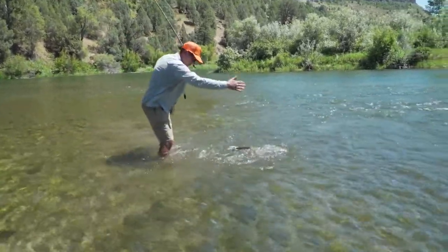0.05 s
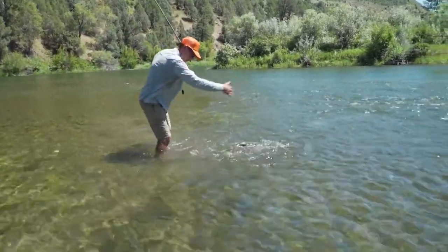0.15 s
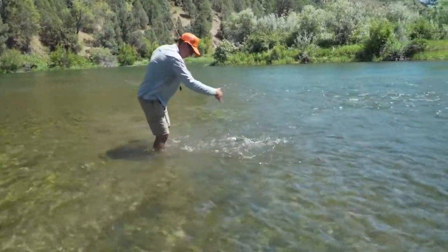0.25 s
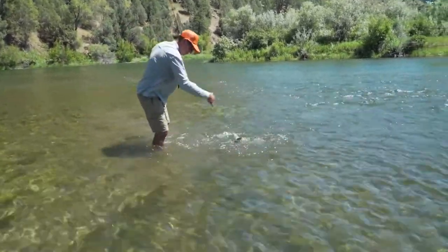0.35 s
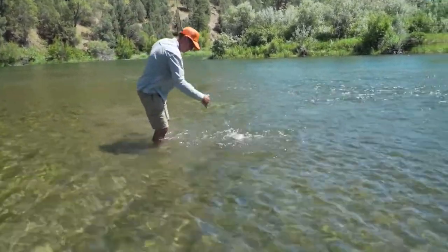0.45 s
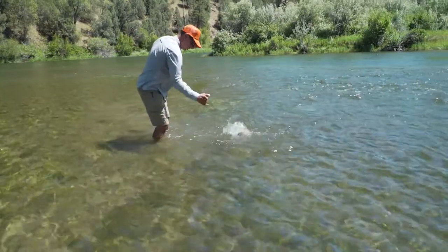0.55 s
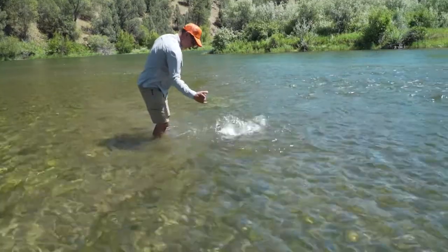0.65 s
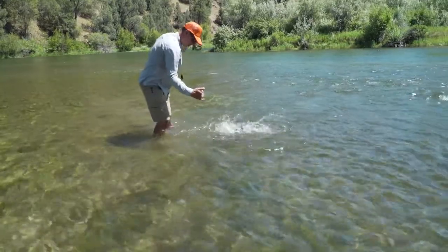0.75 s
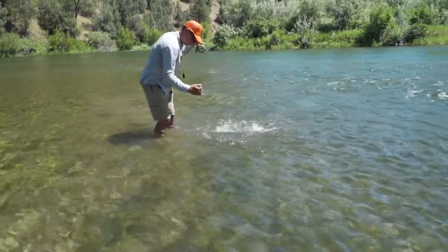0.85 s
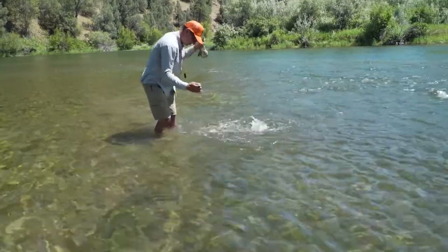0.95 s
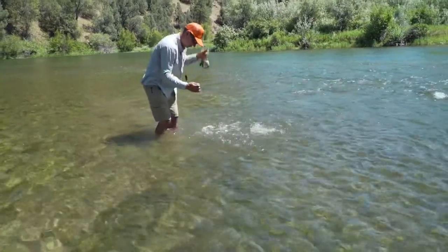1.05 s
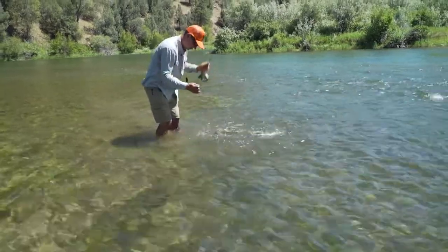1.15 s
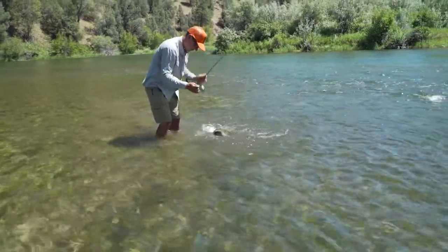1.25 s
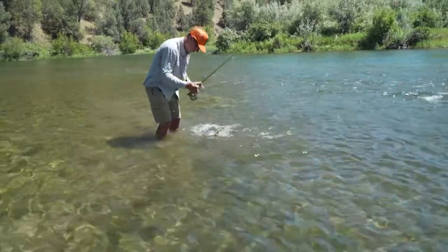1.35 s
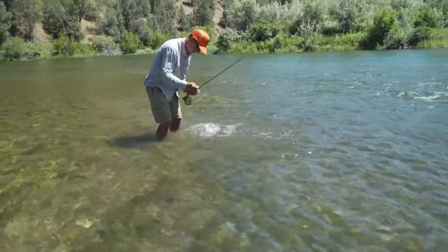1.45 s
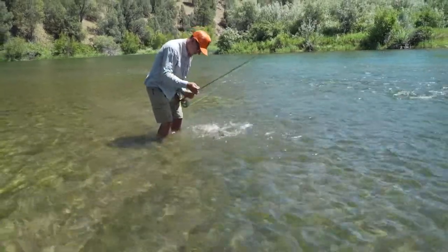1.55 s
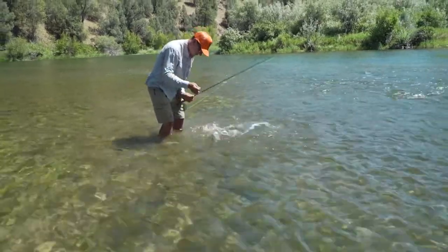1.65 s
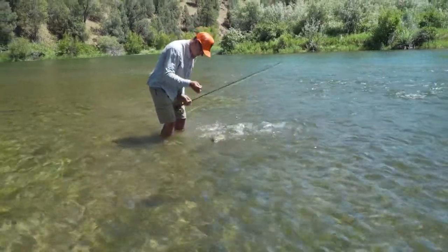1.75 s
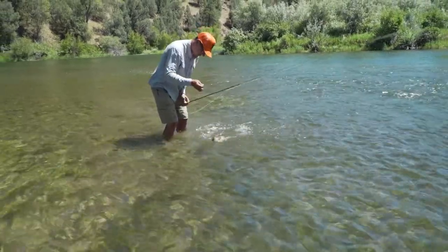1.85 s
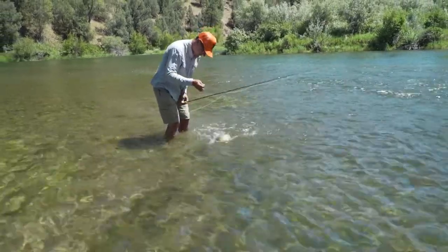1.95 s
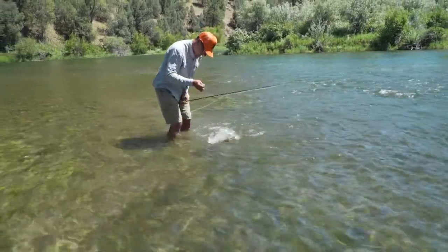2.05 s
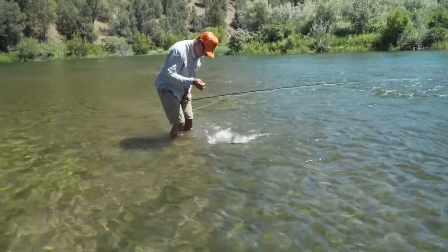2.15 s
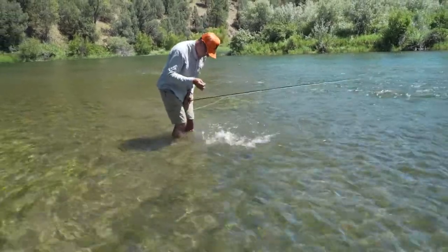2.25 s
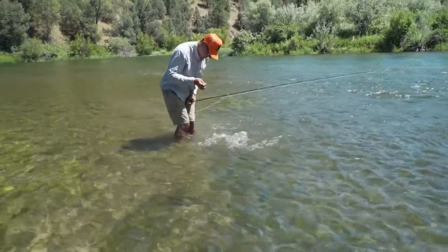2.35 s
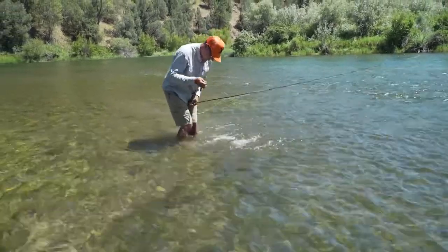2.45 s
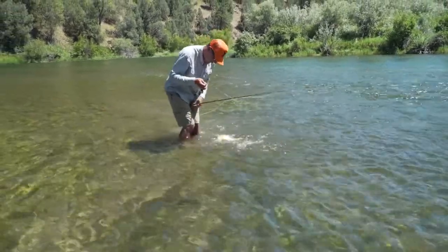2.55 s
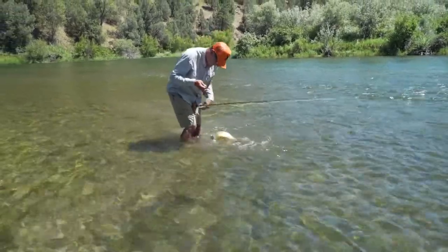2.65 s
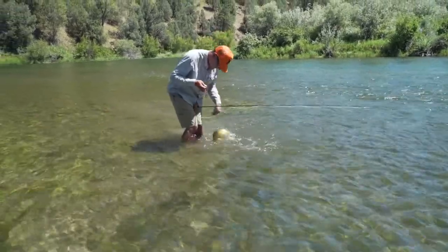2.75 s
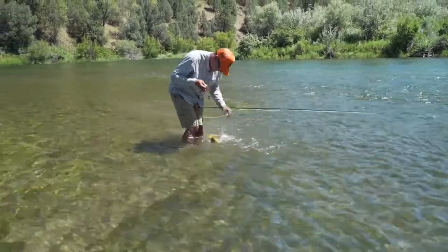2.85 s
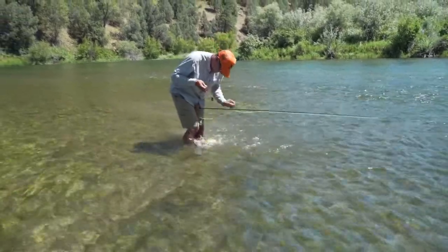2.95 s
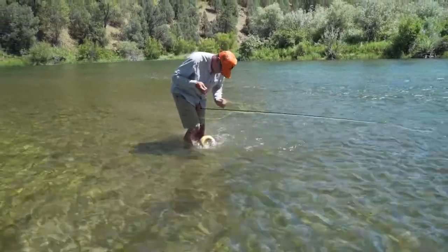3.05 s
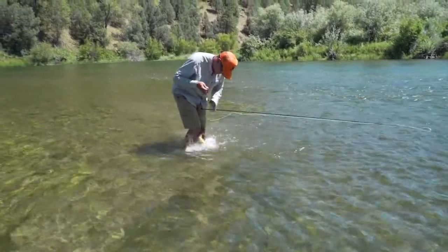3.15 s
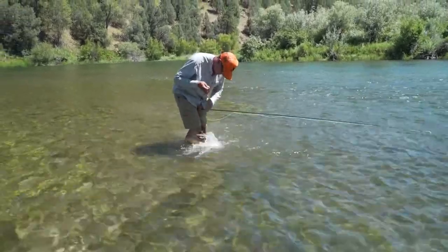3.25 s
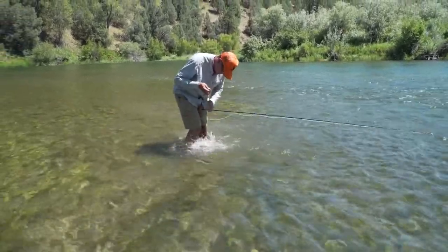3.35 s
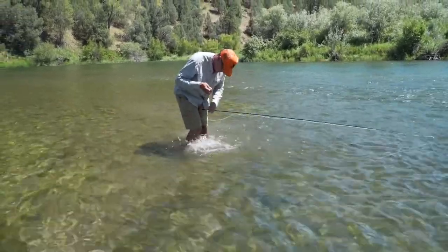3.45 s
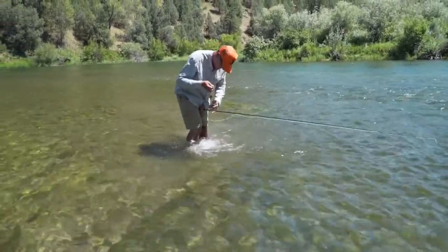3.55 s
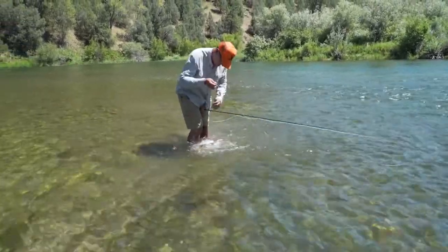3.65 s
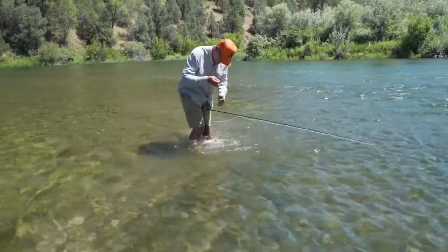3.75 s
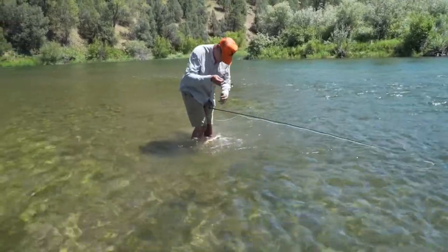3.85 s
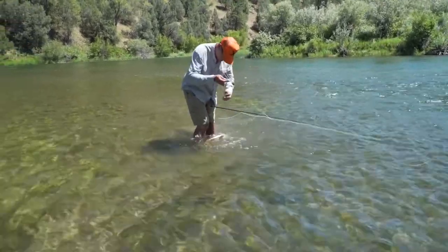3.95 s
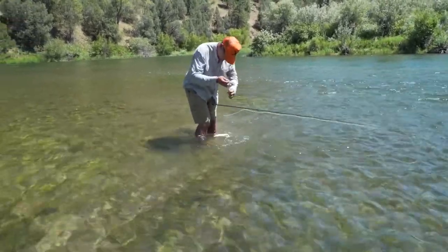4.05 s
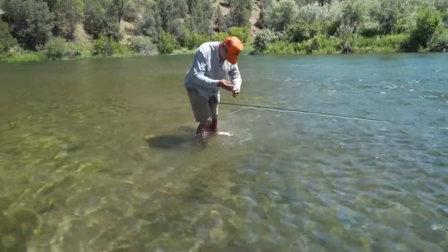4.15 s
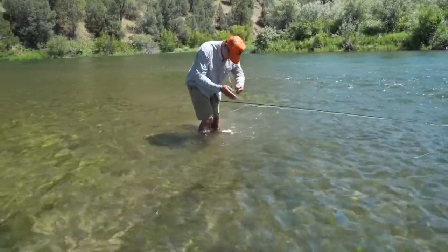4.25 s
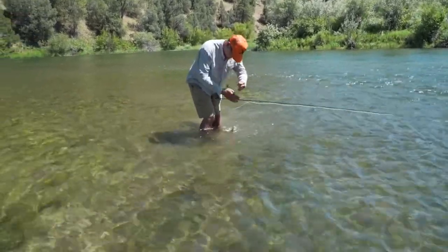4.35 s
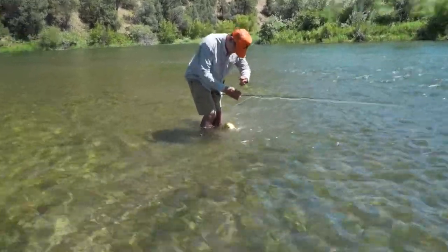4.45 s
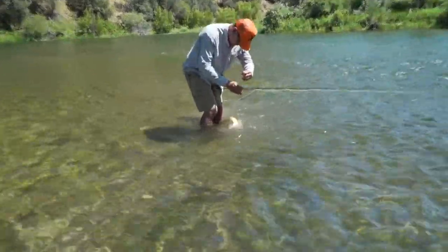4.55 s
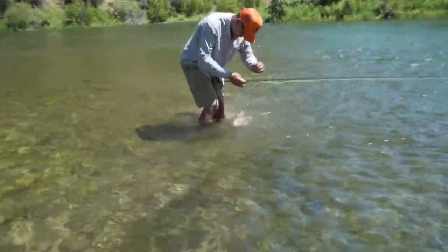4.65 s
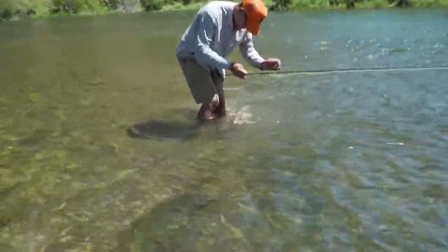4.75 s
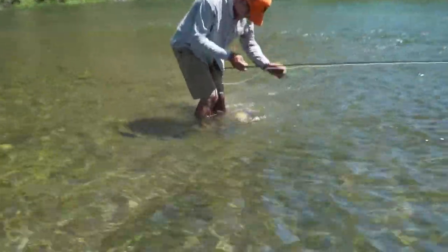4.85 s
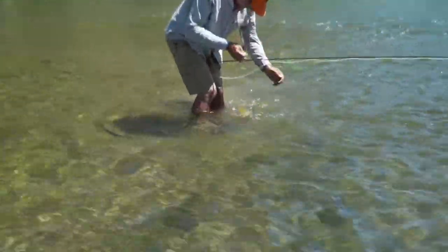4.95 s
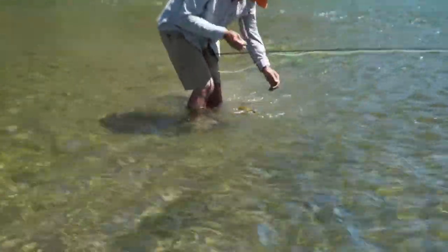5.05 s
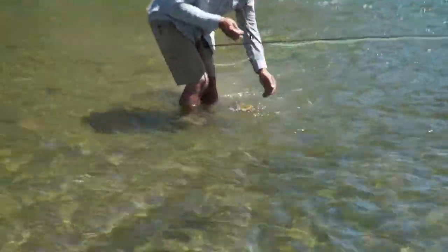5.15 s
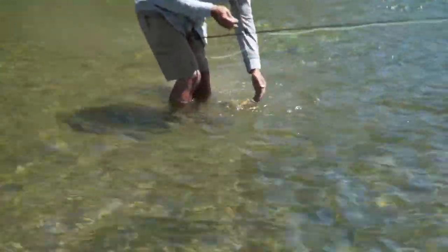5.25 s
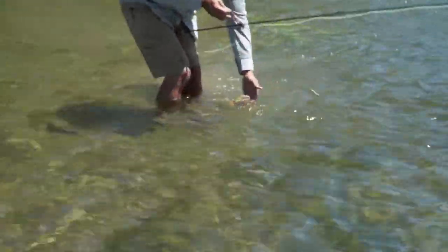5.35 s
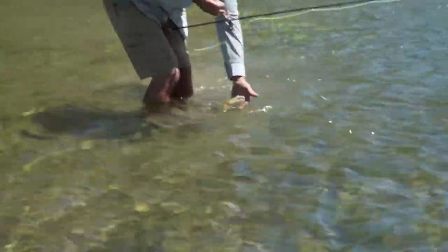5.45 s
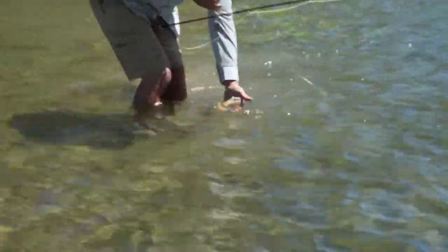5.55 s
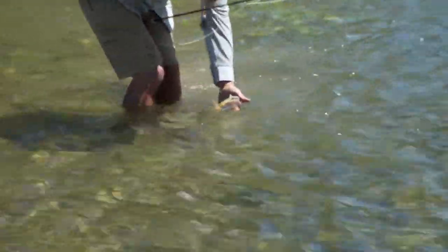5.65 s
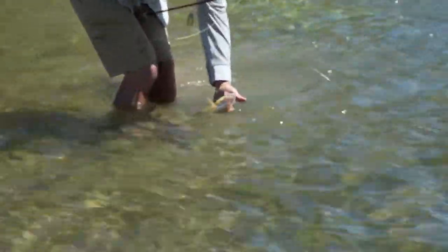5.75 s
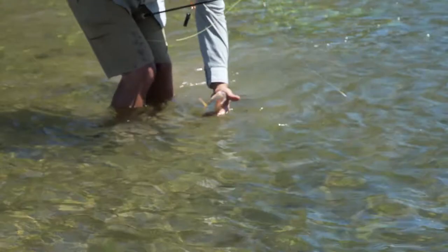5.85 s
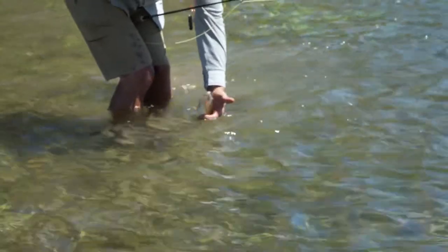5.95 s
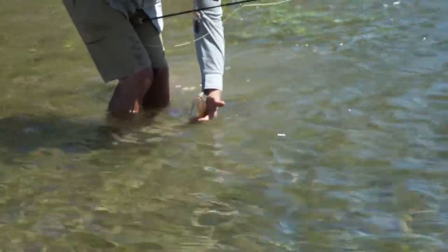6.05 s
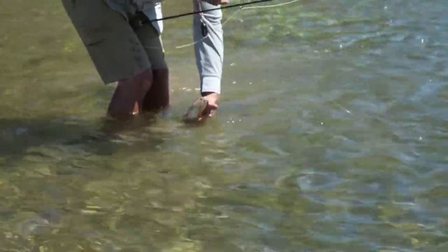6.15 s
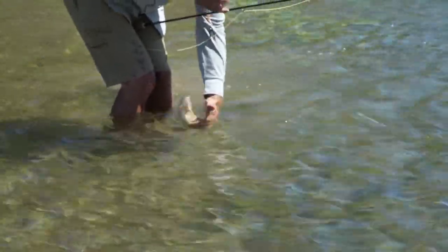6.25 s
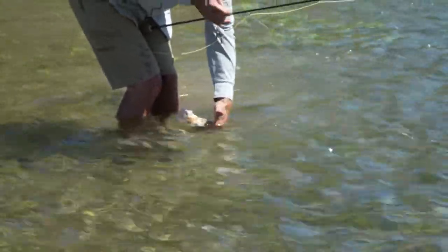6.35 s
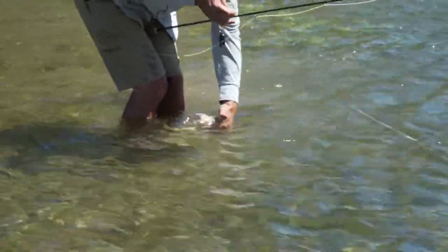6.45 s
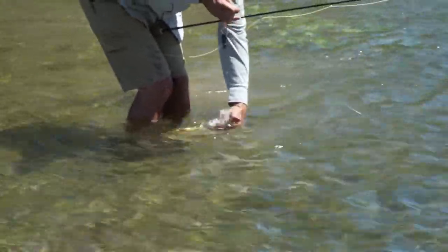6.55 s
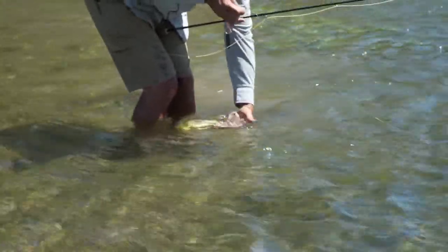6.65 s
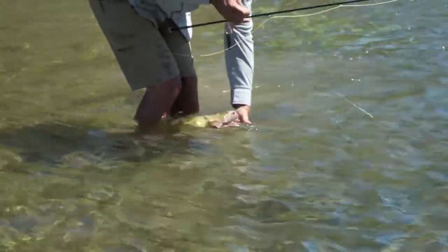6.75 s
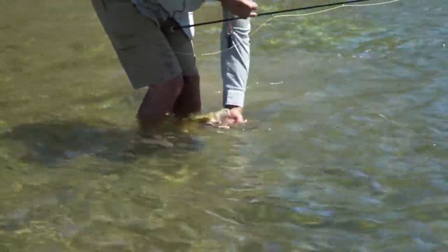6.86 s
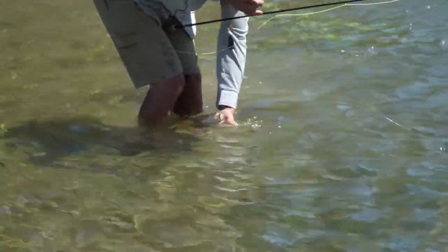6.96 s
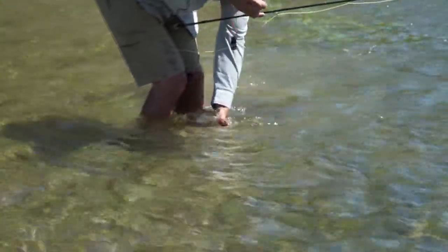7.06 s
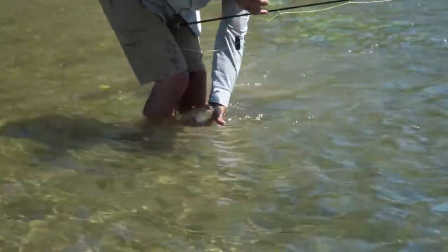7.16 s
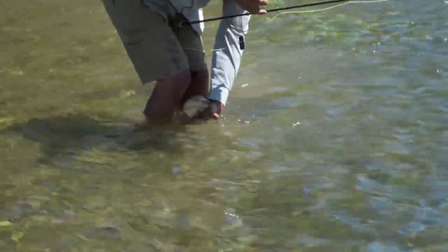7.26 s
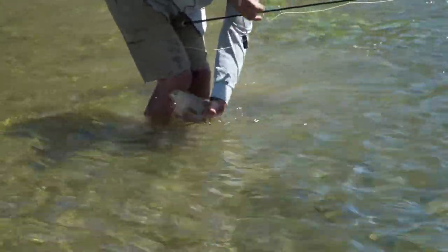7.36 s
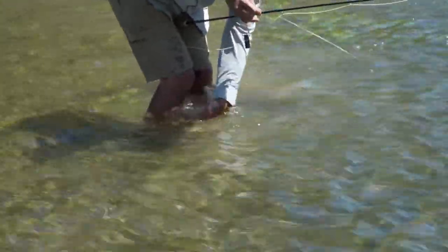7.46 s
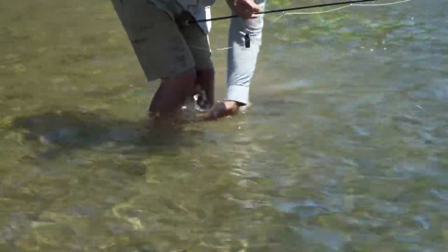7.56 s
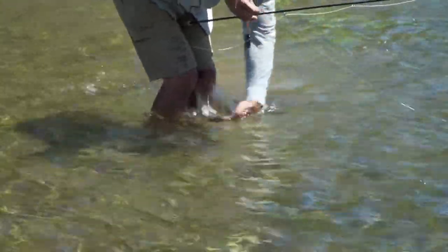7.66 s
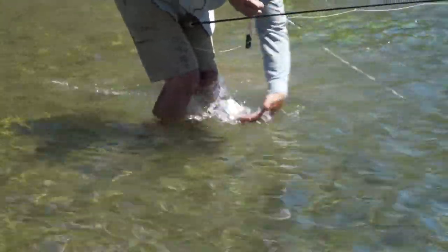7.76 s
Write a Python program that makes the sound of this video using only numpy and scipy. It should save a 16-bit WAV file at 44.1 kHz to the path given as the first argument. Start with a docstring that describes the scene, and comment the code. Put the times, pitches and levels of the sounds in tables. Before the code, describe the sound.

A soft, even river hiss with tiny ripples continues throughout, close and dry in open air. From 0 s a fish beats the surface: light spray and small bubbles first, then denser churning at 0.45-0.9 s with gulps and flicks. After a lull, a loud hollow plop and dull slap land at about 1.36 s, followed by quick splashes and a thin spurt. More gurgling strokes come around 1.9-2.4 s, weaker ones next, then a heavy, bright splash at 3.0-3.2 s, thinning by 3.7 s. Foam fizzes and drops fade. At 4.2 s stirring resumes; a sharp, deep pop hits at 4.55 s, with bubbles and drips after and wet flicks at 5.3 s. Calm follows until 6.6 s, when small slaps and plinks begin. From 7.5 s splashing grows, surging at 7.7 s into strong churning and hollow plops, still active at the end.

```python
"""A hooked fish thrashes at the surface of a shallow river while an angler draws it in by hand.
The current hisses softly throughout. From the start, strokes churn bubbles and foam and throw spray that
patters back; drips ring, closed air pockets ring with a pitch glide (mostly up), sheets of water smack and,
from 1.4 s, thin jets hiss. Bouts fill 0-3.7 s, 4.2-5.3 s and 6.6 s to the end; foam and falling drops
fade in between. Bubbles are gliding decaying sines, washes are coloured noise."""
import sys
import numpy as np
from scipy import signal
from scipy.fft import rfft, irfft
from scipy.io import wavfile
from scipy.ndimage import map_coordinates

SR = 44100
rng = np.random.default_rng(int(sys.argv[2]) if len(sys.argv) > 2 else 0)


def put_to_file(sound):
    """Save the sound as 16-bit audio at rate SR, in the file named by the first command-line argument."""
    columns = np.atleast_2d(sound).T  # one column per channel
    safe = np.clip(columns, -1, 1)
    whole_steps = np.round(safe * 32767)
    wavfile.write(sys.argv[1], SR, whole_steps.astype(np.int16))


N = 344862

# Spectra of the continuous hiss: (frequency [Hz], relative density [dB per Hz])
RIVER_SPECTRUM = [(13, -66), (22, -1), (44, -15), (92, -3.5), (132, -2), (263, -6), (302, -7.5), (398, -11),
                  (510, -10), (961, -14.5), (1580, -17.5), (1910, -19.5), (2520, -20), (10600, -20.5),
                  (16000, -20.5)]
CHURN_SPECTRUM = [(50, -14), (90, 5.5), (140, 6), (230, -2), (350, 0.5), (480, 3.5), (620, 3.5), (830, 1),
                  (1080, -4.5), (1400, 0.5), (1750, -20), (2400, -18), (4000, -18)]
HEAVE_SPECTRUM = [(22, -32), (50, -4.5), (100, -3), (170, -11), (300, -13), (600, -69)]
BIG_DROP_SPECTRUM = [(1100, -1.5), (1900, -1), (2600, -3), (3400, -3.5), (4300, -2), (5100, -18),
                     (7000, -19)]
FINE_DROP_SPECTRUM = [(3200, -32), (4900, -5), (6400, -2.5), (8500, -5.5), (11000, -4), (13500, -1),
                      (16000, -8.5)]
SMACK_SPECTRUM = [(150, 31), (700, -2), (1500, 6.5), (3000, 3.5), (5000, 0), (8000, -0.5), (13000, -2),
                  (16000, 4.5)]
# Strokes of body and tail: (time [s], swell [s], hold with swell [s], churn level [dB], spray level [dB],
# big over fine drops [dB]); levels nominal
STROKES = [ (0, 0.0027, 0.021, -57, -61, -1.5), (0.077, 0.015, 0.2, -63, -62.5, -2),
           (0.329, 0.015, 0.032, -59.5, -65, 0), (0.428, 0.01, 0.013, -53.5, -55, 1.5),
           (0.48, .01, 0.055, -47.5, -56.5, 4.5), (0.572, .015, 0.041, -46, -60.5, 4.5),
           (0.631, 0.02, 0.025, -44, -50.5, 1.5), (0.704, 0.023, 0.04, -51, -53.5, .5),
           (0.778, .04, 0.078, -48.5, -53.5, 3), (0.87, .015, 0.077, -64, -61.5, 5),
           (0.966, 0.022, 0.14, -58.5, -66, -2), (1.306, 0.061, 0.047, -50.5, -53.5, 7),
           (1.398, 0.018, 0.036, -45, -53.5, 5.5), (1.509, .015, 0.034, -49.5, -58, 1),
           (1.571, 0.017, 0.04, -49, -58, 0.5), (1.63, 0.011, 0.025, -48.5, -58.5, -16),
           (1.932, 0.059, 0.076, -45.5, -62, 7), (2.051, .004, 0.095, -46.5, -59, -0.5),
           (2.162, 0.037, .13, -48, -61.5, 4.5), (2.315, 0.0087, 0.02, -52, -56.5, 3),
           (2.37, .015, 0.026, -55, -63.5, 4), (2.44, 0.012, 0.089, -60, -64.5, 3.5),
           (2.606, .015, .04, -55.5, -62.5, -1), (2.816, .015, 0.11, -58, -63, -1.5),
           (2.961, 0.023, .045, -45.5, -56, -4), (3.067, 0.038, 0.027, -38, -46, -5.5),
           (3.135, 0.011, 0.07, -49, -56, -0.5), (3.215, 0.015, 0.072, -55, -61, -8),
           (3.295, 0.029, 0.092, -46, -53.5, -4), (3.447, 0.025, 0.11, -51.5, -57, -3),
           (3.564, .02, 0.11, -56.5, -65.5, 2), (3.682, 0.013, .05, -56, -63, -9),
           (4.184, 0.14, 0.23, -67, -79.5, 8), (4.424, 0.06, 0.13, -53.5, -61.5, -1.5),
           (4.658, 0.06, 0.042, -56.5, -56.5, -6), (4.734, 0.019, 0.014, -50.5, -63, 1),
           (5.288, .015, 0.025, -58.5, -62.5, 5), (6.626, 0.031, 0.038, -67, -66.5, 1),
           (6.79, .02, 0.21, -74, -71.5, -2), (7.034, 0.026, 0.079, -61, -66, 0.5),
           (7.33, 0.053, 0.088, -66.5, -65.5, 0.5), (7.438, 0.024, 0.089, -59, -63, 1),
           (7.528, .02, 0.034, -48, -51.5, -3), (7.617, 0.02, 0.02, -53.5, -60.5, 2.5),
           (7.645, .015, 0.05, -52, -62.5, 4), (7.675, 0.042, .055, -38.5, -49.5, 0),
           (7.767, 0.017, .07, -42.5, -62, 5)]
# Biggest drops falling back: (time [s], peak level [dB], pitch [Hz])
DRIPS = [ (.091, -55, 2200), (.144, -49.5, 2780), (0.266, -40.5, 6600), (0.489, -38, 2100),
         (.935, -43.5, 1130), (1.008, -49, 1820), (1.273, -46.5, 2600), (1.328, -41.5, 4100),
         (1.578, -40.5, 2870), (1.629, -42, 3930), (2.398, -41.5, 1370), (2.526, -47.5, 3760),
         (2.76, -47, 1190), (3.239, -44, 1350), (3.607, -45.5, 2690), (4.737, -44, 1100),
         (4.763, -40, 5650), (4.865, -52, 1380), (4.986, -52, 2050), (5.083, -56.5, 1550),
         (5.14, -48, 4920), (5.268, -50.5, 1570), (6.471, -55.5, 1480), (6.791, -44, 2230),
         (6.814, -45, 1590), (6.955, -54.5, 4100), (7.087, -46.5, 1420), (7.101, -47, 4920),
         (7.256, -55, 1470), (7.359, -51.5, 1520), (7.463, -48, 1680), (7.516, -44.5, 1390),
         (7.648, -47, 2170), (7.782, -40, 1400)]
# Air pockets closed by the fish: (time [s], nominal peak level [dB], starting pitch [Hz],
# rise [octaves/s], swell [s], t60 [s])
POCKETS = [ (.109, -50, 520, 2, .003, .11), (.178, -39.5, 874, -10, .0006, .034),
           (.331, -47, 595, -2.5, .001, .1), (.523, -36, 617, -6, .0066, .035),
           (.547, -31, 730, -5, .0017, .01), (.55, -41.5, 132, 22, .004, .18),
           (.5818, -29.5, 452, 43, .002, .12), (.649, -36, 654, 45, .005, .04),
           (.818, -39, 980, 33, .003, .02), (1.024, -40.5, 660, -4, .0023, .018),
           (1.04, -53, 401, 13, .018, .11), (1.3632, -15.5, 520, -4, .004, .034),
           (1.372, -34, 462, 9, .0056, .064), (1.412, -34, 434, 18, .003, .086),
           (1.4462, -31, 850, 23, .0006, .014), (1.465, -47.5, 233, 4, .007, .2),
           (1.522, -29.5, 700, -24, .001, .017), (1.577, -38.5, 720, 6, .001, .065),
           (1.668, -34, 720, 25, .005, .025), (1.683, -38.5, 1110, 31, .0035, .022),
           (1.934, -45, 590, 0, .002, .083), (2.084, -25, 311, 21, .0025, .083),
           (2.121, -32, 410, 23, .005, .07), (2.621, -34, 338, -15, .0012, .017),
           (2.635, -38, 1110, 3, .0023, .022), (2.636, -38, 200, 2.2, .002, .38),
           (2.841, -39.5, 635, 10.5, .001, .07), (2.87, -46.5, 396, -2, .003, .04),
           (2.9, -47, 1060, 12, .01, .044), (3.099, -21.5, 410, 6.5, .004, .045),
           (3.12, -39, 300, 0, .005, .077), (3.155, -26.5, 1240, 30, .0018, .014),
           (3.328, -33, 313, -9, .0012, .012), (3.363, -33, 543, 34, .0023, .012),
           (3.492, -28.5, 583, 0, .0026, .012), (3.713, -41, 417, 25, .01, .035),
           (3.775, -54, 580, 3.5, .008, .11), (4.486, -39.5, 703, 20, .0067, .042),
           (4.5515, -18.5, 900, -20, .002, .014), (4.557, -38, 330, 0, .0015, .02),
           (4.655, -54, 508, 12, .033, .1), (4.759, -36.5, 716, -18, .0012, .021),
           (4.802, -41.5, 539, 13.5, .0014, .16), (4.83, -32, 335, 52, .028, .041),
           (4.998, -49.5, 391, 24, .036, .14), (6.84, -57, 540, 15, .005, .05),
           (6.876, -57, 510, 2, .004, .08), (7.114, -39, 1290, 0, .001, .009),
           (7.147, -54, 594, 1, .005, .14), (7.476, -40, 667, 18, .0027, .03),
           (7.527, -39, 313, 10, .003, .06), (7.5405, -36, 760, -12, .0015, .03),
           (7.5678, -34, 1200, -70, .0015, .03), (7.573, -30, 490, 21.5, .005, .053),
           (7.615, -34.5, 430, -16, .0024, .063), (7.656, -42, 535, 32, .007, .043),
           (7.7155, -21, 560, 0, .004, .024), (7.716, -30, 220, 11, .0025, .022),
           (7.7925, -19.5, 425, -4, .004, .07), (7.795, -26.5, 190, 0, .005, .06)]
# Smacks and flicks of water: (time [s], nominal level [dB], treble gain above 4 kHz [dB])
SMACKS = [ (.1598, -56, 8), (0.2648, -48, 0), (0.3288, -37.5, -5.5), (.4624, -40.5, -4), (0.5463, -30, 0.5),
          (0.6544, -31.5, -9.5), (.7283, -44, 7), (0.8885, -39, 0), (1.1502, -44.5, 2), (1.202, -39, -3),
          (1.363, -22.5, -15), (1.447, -30, -11), (1.539, -45, 8), (1.6284, -40, -4), (1.8556, -47.5, 10),
          (2.062, -35.5, -14), (2.2196, -42, 1), (2.331, -35, -9), (2.8526, -43, 10), (2.9338, -31.5, 2),
          (2.945, -27, 0), (3.106, -33, -3), (3.1476, -36.5, 8.5), (3.489, -35.5, 4), (3.5696, -40.5, 1),
          (3.6194, -52, 16), (3.73, -36, -7), (4.444, -61, 22), (4.5527, -30.5, -10), (4.56, -41, 3),
          (4.621, -53, 18), (4.7571, -35, -0.5), (4.89, -42.5, -6), (5.294, -36, 2), (5.3141, -32.5, 3.5),
          (6.6354, -45, 5.5), (6.79, -47, -2), (6.809, -47, 7), (6.952, -50, -5), (7.5147, -46, -8),
          (7.5483, -44, 4), (7.7143, -34, -6)]
# Thin sideways jets: (time [s], peak rms level [dB], length [s])
JETS = [(1.398, -60, 0.084), (3.062, -53, .064), (3.082, -48, 0.065), (3.148, -56, 0.076),
        (4.441, -59, 0.07), (4.507, -55, 0.08), (7.705, -50, 0.036)]

RIVER_DB = -64.5
STROKE_T60_S = 0.37
FOAM_DB, FOAM_T60_S = -9, 1.0   # foam keeps bursting after a stroke
FALLBACK_DB, FALLBACK_T60_S = -15.5, 3.36   # thrown drops keep landing
HEAVE_DB_PER_SIZE_DB = 0.55   # strokes that throw big drops displace more water
SMACK_ATTACK_S, SMACK_T60_S = 0.0011, 0.018
SMACK_HALVING_DB = 32   # thin, bright sheets die sooner: this much more treble halves the ring
JET_HZ = 6180
STRAY_LIMIT_DB = -52.5   # lone bubbles grow no louder once the stir passes this
CUTOFF_HZ = 16100


def from_db(db):
    """Decibels to amplitude."""
    return 10 ** (np.asarray(db) / 20)


def rms_one(x):
    """Scale to unit rms."""
    return x / np.sqrt(np.mean(x ** 2) + 1e-20)


def at_hz(spectrum, hz):
    """Amplitude gain of a spectrum, interpolated in dB over log frequency."""
    points_hz, points_db = np.transpose(spectrum)
    return from_db(np.interp(np.log(hz + 1e-9), np.log(points_hz), points_db))


def add(out, time_s, sound):
    """Mix a sound in at a time."""
    i = int(np.clip(round(time_s * SR), 0, N - 1))
    out[i:i + len(sound)] += sound[:N - i]


def noise(spectrum):
    """Steady noise of a given colour; rms 1."""
    size = 2 ** 19
    gain = at_hz(spectrum, np.fft.rfftfreq(size, 1 / SR))
    coloured = irfft(rfft(rng.standard_normal(size)) * gain)
    return rms_one(coloured[:N])


def drift(per_s):
    """Random wandering through per_s points a second; spread near 1."""
    return np.interp(np.arange(N) / SR * per_s, np.arange(4000), rng.standard_normal(4000))


def butter(x, order, hz, kind):
    """Butterworth filter."""
    return signal.sosfilt(signal.butter(order, hz, kind, fs=SR, output="sos"), x)


def bubble(hz, rise_oct_per_s, swell_s, t60_s):
    """Trapped air swells, rings and dies; its pitch glides as it closes and nears the surface."""
    t = np.arange(int((2 * swell_s + t60_s) * SR) + 8) / SR
    octaves = np.clip(rise_oct_per_s * t * t / (t + swell_s), -1, 2)
    pitch_hz = np.minimum(hz * 2 ** octaves, SR / 2)
    swell = np.sin(np.pi / 2 * np.minimum(t / swell_s, 1)) ** 2
    decay = from_db(-60 * np.maximum(t - swell_s, 0) / t60_s)
    return swell * decay * np.sin(2 * np.pi * np.cumsum(pitch_hz) / SR)


def bubble_cloud(spectrum, low_hz, high_hz, per_s, cycles, glide_oct, spread_db, clump_db,
                 patchy_db=3, count=56):
    """Bubbles born in random clumps, small ones more often; each glides over its ring; rms 1."""
    pitches_hz = np.geomspace(low_hz, high_hz, count)
    share = np.sqrt(pitches_hz) / np.sqrt(pitches_hz).sum()
    clumps = from_db(clump_db * drift(110))
    births = np.flatnonzero(rng.random(N) < per_s * clumps / SR)
    strength = from_db(spread_db * np.minimum(rng.exponential(1, N), 4))
    strength = (strength * rng.choice([-1, 1], N))[births]
    kind = np.searchsorted(np.cumsum(share), rng.random(N))[births]
    # bubbles of like size come in shoals, so the colour keeps shifting
    shoals = map_coordinates(rng.standard_normal((count, 400)), [kind / 3, births / SR * 40], order=1)
    strength = strength * from_db(patchy_db * shoals)
    variation = rng.uniform(0.46, 1.73, (count, 2))
    out = np.zeros(N)
    for k, (hz, (ring, climb)) in enumerate(zip(pitches_hz, variation)):
        t60_s = cycles * ring / hz
        grain = bubble(hz, glide_oct * climb / t60_s, .11 * t60_s, t60_s)
        # energy follows the spectrum, whatever the birth rate
        grain = grain * at_hz(spectrum, hz) * np.sqrt(hz / share[k] / np.sum(grain ** 2))
        where = births[kind == k, None] + np.arange(len(grain))
        out += np.bincount(where.ravel(), (strength[kind == k, None] * grain).ravel(), N)[:N]
    return rms_one(out)


def river():
    """Even hiss of distant riffles, with small ripples lapping nearby as bubbles."""
    ripples = bubble_cloud(RIVER_SPECTRUM, 250, 3000, per_s=90, cycles=28, glide_oct=.5,
                           spread_db=2, clump_db=2, patchy_db=2, count=30)
    return from_db(RIVER_DB) * (from_db(0.5) * noise(RIVER_SPECTRUM) + from_db(-12) * ripples)


def thrashing():
    """Stroke powers swell, hold and die into foam and falling drops; gives churn, spray, size in dB."""
    churn, fine, big = np.full((3, N), 1e-12)
    for time_s, swell_s, hold_s, churn_db, spray_db, size_db in STROKES:
        t = np.arange(N - int(time_s * SR)) / SR
        swell = np.minimum(t / swell_s, 1) ** 3
        after_s = np.maximum(t - hold_s, 0)
        push = from_db(-60 * after_s / STROKE_T60_S)
        foam = from_db(FOAM_DB - 60 * after_s / FOAM_T60_S)
        fallback = from_db(FALLBACK_DB - 60 * after_s / FALLBACK_T60_S)
        drops = swell * (from_db(spray_db) * np.maximum(push, fallback)) ** 2
        add(churn, time_s, swell * (from_db(churn_db) * np.maximum(push, foam)) ** 2)
        add(fine, time_s, drops)
        add(big, time_s, drops * from_db(size_db) ** 2)
    return 10 * np.log10([churn, fine, big / fine])


def churned_water(level_db, size_db):
    """Bubble cloud on a wash of foam, with the low heave of displaced water."""
    bubbles = bubble_cloud(CHURN_SPECTRUM, 170, 2200, per_s=900, cycles=25, glide_oct=.75,
                           spread_db=3, clump_db=2.5, patchy_db=3)
    foamy = bubbles + from_db(-10) * noise(CHURN_SPECTRUM)
    heave_db = -61.5 + .5 * (level_db + 43) + HEAVE_DB_PER_SIZE_DB * size_db
    return from_db(level_db - 1.43) * foamy + from_db(heave_db) * noise(HEAVE_SPECTRUM)


def spray(level_db, size_db):
    """Drops patter back as very short pings on a fizz; big drops ping lower."""
    fine = bubble_cloud(FINE_DROP_SPECTRUM, 4500, 16300, per_s=2000, cycles=20.3, glide_oct=0.097,
                        spread_db=3.0, clump_db=6.5, patchy_db=1.5)
    big = bubble_cloud(BIG_DROP_SPECTRUM, 1600, 5200, per_s=1500, cycles=17.2, glide_oct=0.28,
                       spread_db=2.5, clump_db=2.5, patchy_db=3.0, count=30)
    fine = from_db(-1.73) * fine + from_db(-10.5) * noise(FINE_DROP_SPECTRUM)
    big = from_db(-4.0) * big + from_db(-7.5) * noise(BIG_DROP_SPECTRUM)
    return from_db(level_db) * (fine + from_db(size_db) * big)


def strays(stir_db, low_hz, high_hz, over_db, spread_db, rise_oct_per_s, cycles, count):
    """Lone bubbles at random moments; level follows the stir of the water, up to a limit."""
    out = np.zeros(N)
    for when, size, weakness, climb in rng.random((count, 4)):
        hz = low_hz * (high_hz / low_hz) ** size
        db = min(stir_db[int(when * N)], STRAY_LIMIT_DB) + over_db - spread_db * weakness
        sound = bubble(hz, 2 * rise_oct_per_s * climb, 2 / hz, cycles / hz)
        add(out, when * N / SR, from_db(db) * sound)
    return out


def drips():
    """Each drop traps one small bubble that rings for a few tens of cycles."""
    out = np.zeros(N)
    for time_s, db, hz in DRIPS:
        add(out, time_s, from_db(db) * bubble(hz, rise_oct_per_s=5.7, swell_s=0.00066, t60_s=42 / hz))
    return out


def air_pockets():
    """Big pockets ring one by one; uneven shape adds a weaker, shorter upper mode."""
    out = np.zeros(N)
    for time_s, db, hz, rise, swell_s, t60_s in POCKETS:
        add(out, time_s, from_db(db) * bubble(hz, rise, swell_s, t60_s))
        add(out, time_s, from_db(db - 16) * bubble(1.7 * hz, rise, swell_s, 0.3 * t60_s))
    return out * from_db(1.2 * drift(400))   # slight level flutter


def smacks():
    """A sheet of water hits the surface and shatters: a burst of tiny pings dying within milliseconds."""
    pings = bubble_cloud(SMACK_SPECTRUM, 350, 15500, per_s=12000, cycles=13, glide_oct=.1,
                         spread_db=1.5, clump_db=1, patchy_db=4)
    dull, bright = butter(pings, 3, 4000, "low"), butter(pings, 3, 4000, "high")
    out = np.zeros(N)
    for time_s, db, treble_db in SMACKS:
        t60_s = SMACK_T60_S * 2 ** (-treble_db / SMACK_HALVING_DB)
        i = np.arange(int(time_s * SR), min(int((time_s + t60_s) * SR), N))
        t = (i - i[0]) / SR
        attack = 1 - np.exp(-t / SMACK_ATTACK_S)
        decay = from_db(db + 1.0 - 60 * t / t60_s)
        add(out, time_s, attack * decay * (dull[i] + from_db(treble_db) * bright[i]))
    return out


def scatter(x, t60_s, level_db):
    """The rippled surface throws back a short, dull smear: a decaying noise tail."""
    t = np.arange(SR // 4) / SR
    tail = butter(rng.standard_normal(len(t)), 1, 3500, "low") * from_db(-60 * t / t60_s)
    return from_db(level_db) * signal.oaconvolve(x, tail / np.linalg.norm(tail))[:N]


def jets():
    """A jet tears into drops of one size: a narrow hiss that swells and fades."""
    out = np.zeros(N)
    for time_s, db, length_s in JETS:
        hiss = butter(rng.standard_normal(SR // 4), 2, [JET_HZ / 1.11, JET_HZ * 1.11], "band")
        swell = np.hanning(int(length_s * SR))
        add(out, time_s, from_db(db) * swell * rms_one(hiss)[:len(swell)])
    return out


def scene():
    """The fish in the flowing river."""
    churn_db, spray_db, size_db = thrashing()
    gurgles = strays(churn_db, 391, 1163, over_db=6.5, spread_db=9, rise_oct_per_s=8.7, cycles=52, count=70)
    droplets = strays(spray_db, 1236, 5120, over_db=13, spread_db=8.5, rise_oct_per_s=10.0,
                      cycles=30, count=200)
    slaps = gurgles + droplets + drips() + air_pockets() + smacks()
    fish = churned_water(churn_db, size_db) + spray(spray_db, size_db)
    fish += slaps + scatter(slaps, t60_s=0.063, level_db=-15.5) + jets()
    return (river() + fish)[None]


def record(dry):
    """Steep elliptic low-pass cuts the top."""
    return signal.sosfilt(signal.ellip(12, .1, 70, CUTOFF_HZ, fs=SR, output="sos"), dry)


dry = scene()
out = record(dry)
put_to_file(out)
```